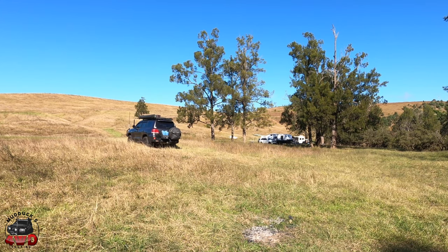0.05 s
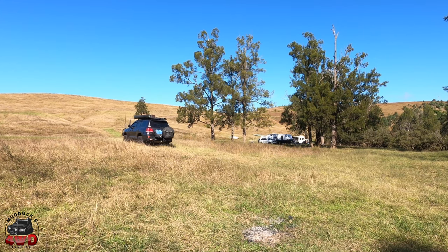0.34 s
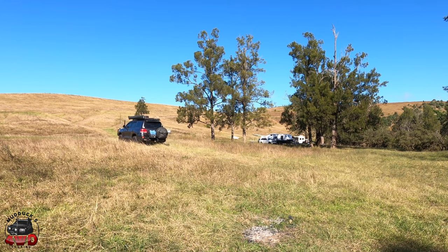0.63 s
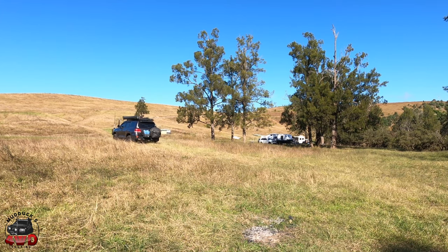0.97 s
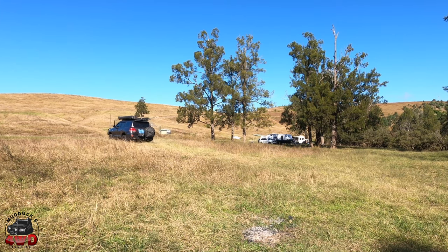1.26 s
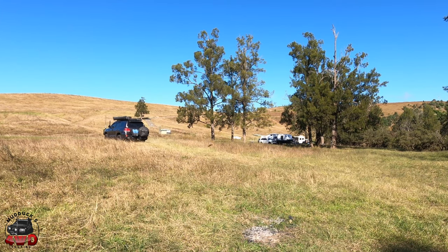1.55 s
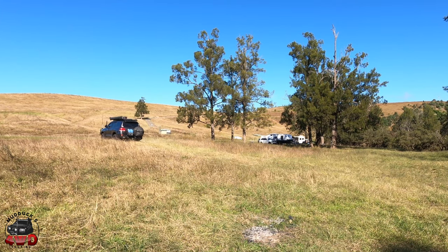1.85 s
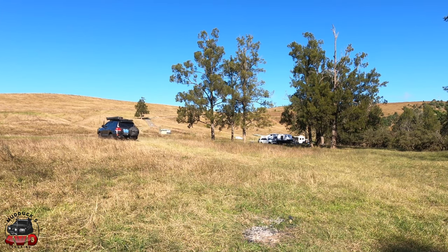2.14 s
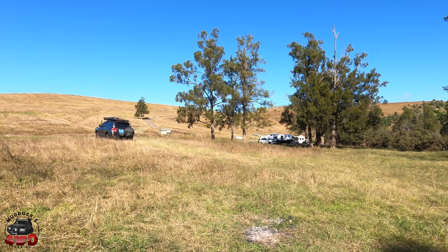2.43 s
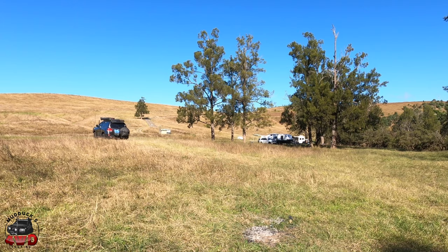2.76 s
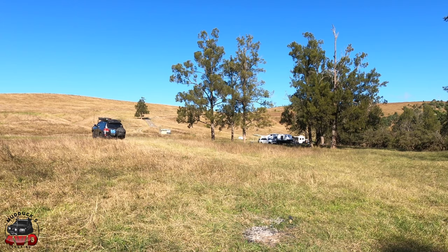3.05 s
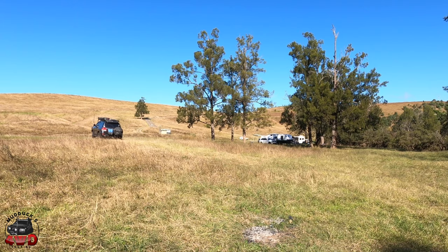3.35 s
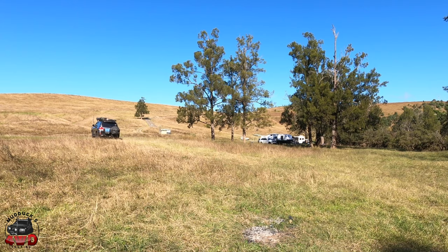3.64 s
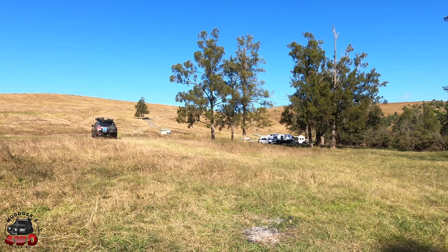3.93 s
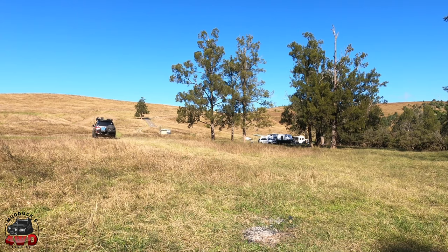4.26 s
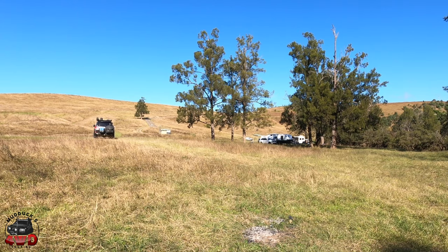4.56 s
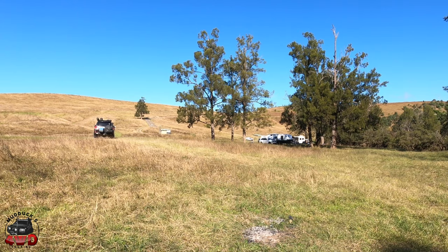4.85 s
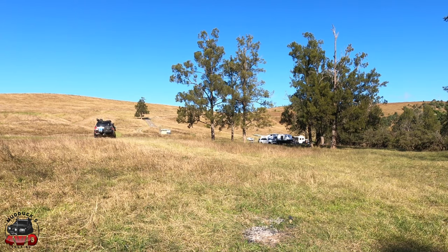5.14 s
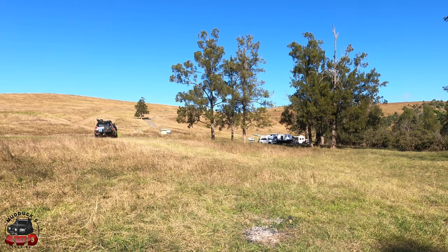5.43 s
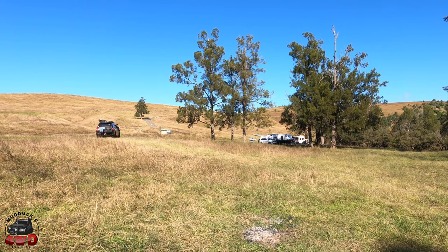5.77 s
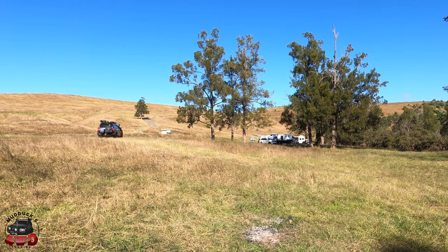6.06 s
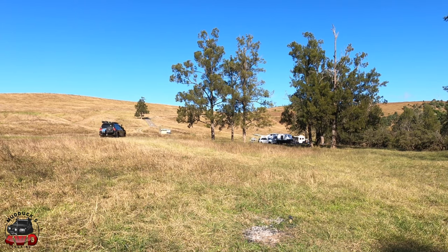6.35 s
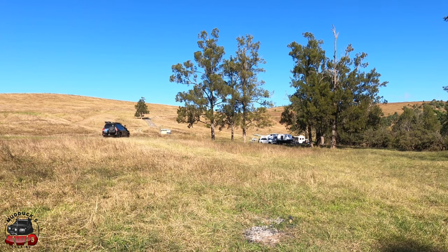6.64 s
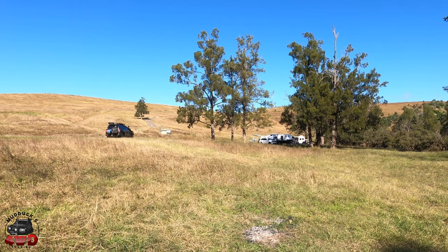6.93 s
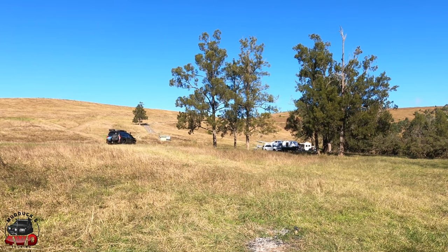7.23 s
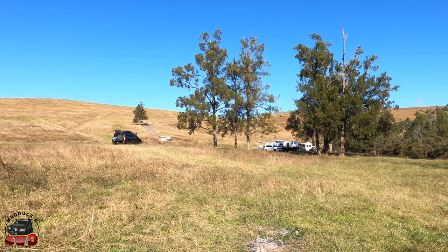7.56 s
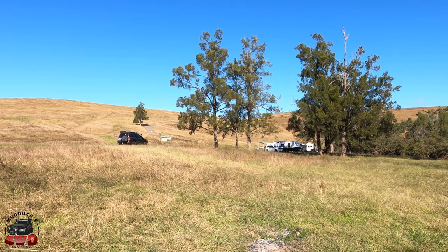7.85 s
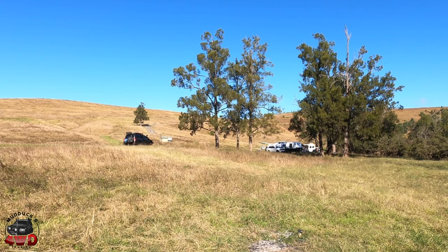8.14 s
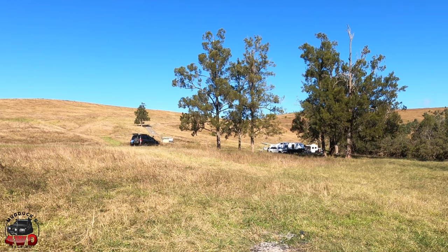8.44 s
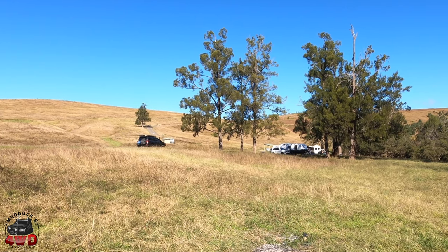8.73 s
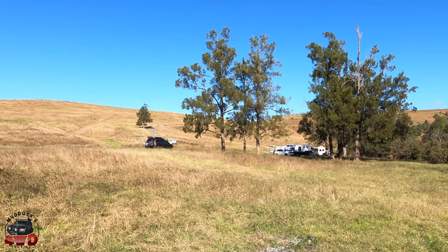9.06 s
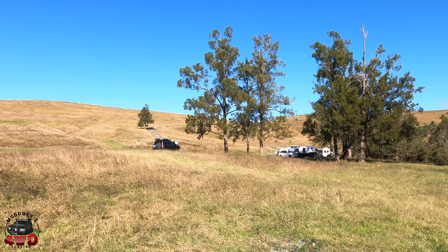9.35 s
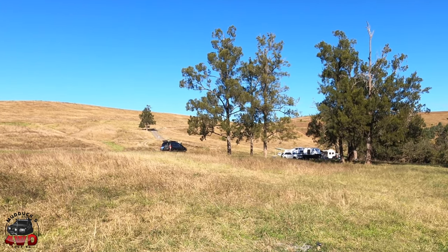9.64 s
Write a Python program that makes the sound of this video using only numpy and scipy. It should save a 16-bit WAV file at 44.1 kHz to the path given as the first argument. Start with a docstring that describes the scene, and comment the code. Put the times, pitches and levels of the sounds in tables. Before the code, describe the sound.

Outdoors in a light breeze, a low, pulsing exhaust and a rattling engine move slowly away from the microphone. Tyres brush through dry grass at first, then thin out to scattered snaps of stalks. Small birds chirp now and then from the trees. The off-road vehicle eases almost to idle, squeals faintly, then pulls again with a steady drone and turns in the distance.

```python
"""A four-wheel drive crawls away over a dry paddock in a light breeze. From the start, exhaust pulses
burble through muffler and tailpipe, the engine clatters, tyres swish, stalks snap and a turbo whistle falls.
Distance weakens the vehicle, the treble first. Near 3 s birds begin to call from the trees, and a thin
squeal soon creeps in and fades. From 5.6 s the tailpipe drones under a long pull; after 7 s the vehicle
turns, its tyres scrubbing the turf, and a hollow roar escapes from the wheel arches."""
import sys
import numpy as np
from scipy import signal
from scipy.fft import rfft, irfft
from scipy.io import wavfile
from scipy.ndimage import uniform_filter1d

SR = 44100
rng = np.random.default_rng(int(sys.argv[2]) if len(sys.argv) > 2 else 0)


def pcm_store(signal):
    """Save signal as 16-bit PCM."""
    levels = np.round(np.clip(np.atleast_2d(signal), -1, 1) * 32767)
    wavfile.write(sys.argv[1], SR, levels.astype(np.int16).T)


N = 427329
TIME = np.arange(N) / SR
START_M, SPEED_M_PER_S, NEAR_M, FAR_M = 13.7, 4.1, 14.7, 26.9
CRUISE_HZ, IDLE_HZ = 72.7, 61.7  # exhaust beats per second

# Engine speed. Each row: time in seconds, exhaust beats per second.
BEAT_RATE = [(0.0, 90.6), (0.12, 87.8), (0.33, 79.7), (0.55, 82.1), (0.7, 80.1), (0.9, 80.3), (1.18, 63.6),
             (1.45, 61.11), (1.64, 65.5), (2.1, 60.0), (2.28, 66.95), (2.72, 67.13), (2.96, 60.64),
             (3.18, 75.65), (3.51, 53.68), (3.78, 66.21), (4.35, 58.58), (4.62, 69.19), (4.83, 62.81),
             (5.24, 70.72), (5.38, 62.34), (5.6, 82.41), (5.88, 72.28), (6.18, 82.1), (6.52, 81.4),
             (6.68, 79.5), (7.06, 84.1), (7.3, 83.1), (7.46, 84.5), (7.7, 79.45), (7.94, 84.14),
             (8.38, 74.81), (8.8, 79.65), (8.92, 74.36), (9.12, 75.96), (9.3, 81.29), (9.5, 72.75),
             (9.69, 74.59)]
# The eight cylinders of one engine cycle. Each row: boom strength, boom delay in beats, rasp strength,
# rasp delay in beats, gas puff strength.
CYLINDERS = [(.96, .01, .36, -.11, .26), (1.33, .06, .88, -.12, .64), (1.0, -.07, .26, -.09, .39),
             (.83, .01, .2, -.11, .23), (.88, .05, .92, .22, .26), (1.52, .03, .92, -.15, .64),
             (.68, -.03, 1.0, .31, .41), (.64, -.02, .55, .05, .28)]
# Pedal lifts and presses. Each row: centre and half-width in seconds, boom and rasp change in dB.
PEDAL_MOVES = [(1.045, 0.07, 1, 1), (3.41, 0.071, 0.5, -9.5), (3.778, 0.13, 0.5, 0.5), (4.15, 0.27, 1, -2),
               (4.652, 0.027, -4, 2), (5.096, 0.31, 1, 1.5), (5.295, 0.042, 1, 0), (5.955, 0.16, -2, 0),
               (7.0, 0.84, 0, -4.5), (7.448, 0.37, 2.5, -0.5), (7.69, 0.045, -5, 2),
               (8.436, 0.069, 4.5, 1.5), (9.07, 0.042, 2.5, 1.5), (9.607, 0.066, 4, 2)]
# Exhaust filter responses. Each row: frequency in Hz, gain in dB.
MUFFLER_RESPONSE = [(15, -35.5), (32, -9.5), (48, 3), (64, 4), (85, -4), (105, 1.5), (130, -6.5),
                    (165, -15.5), (200, -27), (270, -32), (450, -83), (3000, -110)]
TAILPIPE_RESPONSE = [(60, -24.5), (140, 3.5), (195, -7), (230, 4.5), (280, 3), (320, -1), (360, -5),
                     (398, -1.5), (450, -12), (560, -28), (710, -32), (860, -39.5), (1500, -68.5),
                     (6000, -97)]
# Exhaust level laws. Each holds: base level in dB, dB per Hz above cruise, dB per Hz/s of pick-up,
# dB lost per Hz under idle, dB lost side on, dB lost in the turn.
BOOM_LEVEL_LAW = (-25, -0.0363, 0.0291, 0.7, 1.84, 3)
RASP_LEVEL_LAW = (-39.5, 0.32, 0.0386, 0.5, 0.9, 0.7)
# The vehicle's aspect. Each row: time in seconds, flank shown from 0 (tail on) to 1 (side on).
FLANK_SHOWN = [(0, 1), (.6, 0.36), (1.15, 0.64), (1.7, 0.33), (3.5, 0.56), (4.4, 0.15), (5.5, 0.045),
               (7.4, 0.48), (8.3, 0.52), (9.69, 0.89)]
# The turn that swings the tailpipe away: start and end in seconds.
TURN_SPAN_S = (7.2, 8.01)
# Tailpipe resonances. Each row: centre and half-width in seconds, pitch in Hz, level in dB.
PIPE_MODES = [(.5, .5, 322, -45), (.5, .45, 238, -45), (3.15, .15, 398, -53), (5.4, .3, 388, -54),
              (6.2, .3, 402, -57), (7.9, .22, 252, -52), (7.95, .3, 317, -51.5), (7.95, .28, 404, -57)]
# Engine clatter spectra, near and far. Each row: frequency in Hz, gain in dB.
CLATTER_NEAR_SPECTRUM = [(100, -15), (450, 7), (590, -4), (710, -0.5), (870, -14.5), (1190, -2.5),
                         (1400, -1), (1600, -3.5), (2100, -6), (2600, -8.5), (3400, -16), (5000, -33),
                         (9000, -50.5), (13000, -66)]
CLATTER_FAR_SPECTRUM = [(100, -10), (470, 5.5), (580, -11.5), (720, -2), (860, -3), (1100, 4.5),
                        (1300, 3.5), (1650, 4.5), (2100, -3.5), (2900, -6.5), (3400, -15), (5000, -35.5),
                        (9000, -56), (13000, -75)]
# Engine panel resonances. Each row: pitch in Hz, bandwidth in Hz, relative level in dB.
PANEL_MODES = [(705, 130, -6.5), (1215, 65, -10), (1577, 130, -6), (2150, 480, -13), (2780, 105, -9),
               (3760, 130, -12.5), (3980, 120, -13)]
# Tyre swish spectrum, and its further filter at full distance. Each row: frequency in Hz, gain in dB.
SWISH_SPECTRUM = [(500, -1), (2000, 4.5), (3000, 6), (3450, 3.5), (3850, 4), (4250, -1), (4500, -.5),
                  (5500, -4), (7000, -10.5), (8500, -14.5), (10000, -19.5), (11000, -26.5), (14000, -34.5)]
SWISH_FAR_RESPONSE = [(500, 0.5), (3000, 4.5), (3850, 1.5), (5000, 5.5), (7300, 6), (9000, -4),
                      (14000, -18)]
# Loudness of the swish. Each row: time in seconds, level in dB.
SWISH_LEVEL = [(0, -49.5), (.8, -53), (1.6, -59.5), (2.6, -63.5), (3.9, -64.5), (4.6, -69), (4.72, -71.5),
               (5.2, -69.5), (7.0, -74), (7.6, -69), (8.3, -73), (9.69, -75)]
# Tussocks scraping the underside. Each row: centre and half-width in seconds, pitch in Hz, level in dB.
TUSSOCK_SCRAPES = [(0.034, 0.11, 2300, -51), (.105, 0.017, 1830, -51), (0.198, 0.01, 3820, -51),
                   (.60, 0.027, 3870, -58), (0.687, 0.023, 3930, -54.5), (0.8, 0.028, 3850, -53.5),
                   (1.13, 0.013, 2450, -51.5), (1.323, 0.028, 1530, -53.5), (1.843, 0.057, 1380, -58),
                   (1.858, .035, 3870, -60.5)]
# Open-air rumble. Each row: frequency in Hz, gain in dB.
AIR_SPECTRUM = [(15, -13.5), (30, -13.5), (80, -4), (200, -8), (500, -29.5), (1000, -40.5), (3000, -48),
                (7000, -61), (9000, -76.5), (14000, -79)]
# Puffs of breeze. Each row: centre and half-width in seconds, level in dB.
BREEZE_PUFFS = [(2.931, 0.23, -47.5), (6.621, 0.21, -46)]
# Prominent stalk snaps. Each row: start in seconds, peak in dB before dulling, pitch and bandwidth in Hz.
STALK_SNAPS = [(1.915, -61, 8900, 3000), (2.142, -57, 7500, 2500), (2.44, -59, 7140, 1220),
               (3.418, -62, 5050, 1500), (3.535, -64, 7550, 450), (3.699, -56, 4900, 1800),
               (3.8, -72, 7900, 600), (3.889, -62, 7000, 3000), (4.02, -61, 7500, 3500),
               (4.142, -66, 7700, 900), (4.405, -70, 7700, 1200), (5.022, -59, 4700, 1500),
               (5.045, -73, 7900, 405), (5.297, -48, 2550, 650), (5.297, -58, 4100, 1800),
               (5.461, -61, 5600, 3000), (6.225, -69, 6100, 400), (6.384, -65, 4880, 900),
               (6.475, -62, 6000, 3500), (7.365, -58, 4000, 1200)]
# Bird notes. Each row: start and length in seconds, pitch and glide in Hz, level in dB, hoarseness 0-1.
BIRD_NOTES = [(2.818, 0.11, 4170, -100, -68.5, .4), (2.89, .24, 4330, -100, -68.5, 0.68),
              (2.979, .11, 1320, -190, -60, 0.55), (3.402, 0.15, 964, 56, -68, 0.6),
              (3.52, .045, 1980, -250, -55, .6), (3.665, .3, 1060, -15, -56, .38),
              (3.924, 0.075, 4240, -100, -62.5, 0.35), (3.96, .07, 2060, -100, -63, 0.2),
              (4.13, 0.055, 2080, 301, -63.5, .45), (4.495, 0.05, 2015, -50, -59.5, 0.28),
              (4.645, 0.04, 2000, 46, -64, .6), (5.325, .08, 3880, -70, -70.5, .25),
              (5.373, 0.075, 1850, -190, -63.5, 0.2), (5.475, .11, 1940, 100, -60.5, 0.15),
              (5.545, .103, 1930, -175, -56, .2), (6.043, .1, 2920, 34, -70, 0.3),
              (6.058, .08, 3370, 9, -73, .2), (7.98, .14, 1310, 0, -62.5, .2),
              (9.185, .085, 1700, 0, -61, .2), (9.26, .14, 1285, -40, -60, .25),
              (9.215, .05, 4900, 200, -74, .6), (9.604, .04, 3050, 78, -68, .3),
              (9.605, .05, 1500, 0, -63, .3)]
# Bands of the squeal. Each row: pitch in Hz, bandwidth in Hz, level in dB.
SQUEAL_BANDS = [(3850, 900, -72), (4760, 420, -75), (5780, 400, -88)]
# Overtones of the long pull. Each row: multiple of the beat rate, level in dB.
DRONE_PARTIALS = [(2.75, -56), (3, -54), (3.125, -58), (3.25, -55), (3.875, -59), (4.875, -62), (5, -58.5)]
# Tyres groaning through the turn. Each row: centre in seconds, pitch and bandwidth in Hz, level in dB,
# half-width in seconds.
TURF_SCRUBS = [(7.6, 336, 130, -59, 1), (7.55, 450, 92, -58, .9), (7.7, 670, 200, -67.5, 0.98),
               (7.53, 2700, 550, -66.5, 0.27)]
# Likeness of the two microphone ports, near and far. Each row: frequency in Hz, coherence 0-1.
COHERENCE_NEAR = [(100, 0.9), (300, 0.9), (700, 0.99), (1400, 1), (2900, 0.97), (6000, 1), (13000, 0.5)]
COHERENCE_FAR = [(100, 1), (300, 0.88), (700, 0.62), (1400, 0.86), (2900, 0.42), (6000, 0.47), (13000, .3)]
# Level of the left port over the right. Each row: frequency in Hz, ratio in dB.
PORT_BALANCE = [(60, 1.3), (200, 1.4), (360, 0), (670, .4), (1210, 1.8), (2220, 2.5), (4050, .4),
                (13500, -.6)]
# Phase of the left port against the right. Each row: frequency in Hz, lead in radians.
PORT_LEAD = [(0, 0), (860, -.36), (3010, -.7), (3790, -1.0), (4740, -.35), (6460, -1.1), (8440, .3),
             (10300, -1.2), (13600, 0)]


def amp(db):
    """Amplitude grows tenfold with every 20 dB."""
    return 10 ** (np.asarray(db) / 20)


def unit(x):
    """Normalisation brings the rms to 1."""
    return x / np.sqrt(np.mean(np.abs(x) ** 2) + 1e-20)


def steady(x):
    """Division by the running rms levels the envelope."""
    power = uniform_filter1d(uniform_filter1d(x ** 2, size=8000), size=6000)
    return x / np.sqrt(np.abs(power) + 1e-20)


def curve(points):
    """Linear interpolation joins points into a curve over time."""
    return np.interp(TIME, *np.transpose(points))


def swell(centre_s, half_width_s):
    """A Gaussian envelope falls to 1/e one half-width from its centre."""
    return np.exp(-((TIME - centre_s) / half_width_s) ** 2)


def spectrum_at(points, hz):
    """A spectrum is interpolated on a log-frequency axis."""
    f, value = np.transpose(points)
    return np.interp(np.log(hz + 1), np.log(f + 1), value)


def drift(hz):
    """Noise low-passed at hz gives a random fluctuation of rms 1."""
    rolloff = 1 + (np.fft.rfftfreq(N, 1 / SR) / hz) ** 4
    return unit(irfft(rfft(rng.standard_normal(N)) / rolloff, N))


def colour(x, points, size=8192):
    """A minimum-phase filter imposes a spectrum and rings after each pulse."""
    log_gain = np.log(amp(spectrum_at(points, np.abs(np.fft.fftfreq(size, 1 / SR)))))
    ring = np.fft.ifft(np.exp(np.conj(signal.hilbert(log_gain)))).real[:size // 2]
    return signal.oaconvolve(x, ring)[:N]


def resonate(x, hz, width_hz):
    """A resonator passes a band around hz, which may move."""
    carrier = np.exp(2j * np.pi * np.cumsum(hz * np.ones(len(x))) / SR)
    r = np.exp(-np.pi * width_hz / SR)
    return (carrier * signal.lfilter([(1 - r) ** 2], [1, -2 * r, r * r], x / carrier)).real


def noise_band(hz, width_hz, samples=N):
    """A resonator driven by white noise gives a band of noise, here of rms 1."""
    return unit(resonate(rng.standard_normal(samples), hz, width_hz))


def add(mix, start_s, sound):
    """Superposition: a sound adds to the mix from its start time."""
    part = mix[max(round(start_s * SR), 0):][:len(sound)]
    part += sound[:len(part)]


def distance():
    """Uniform motion carries the vehicle away; the range is in metres."""
    return START_M + SPEED_M_PER_S * TIME


def spreading_db():
    """Spherical spreading costs 6 dB per doubling of distance."""
    return -20 * np.log10(distance() / START_M)


def farness():
    """Range sets a blend from 0 (near) to 1 (far)."""
    return np.clip((distance() - NEAR_M) / (FAR_M - NEAR_M), 0, 1)


def scatter(source, coherence):
    """Scattered sound is only partly coherent at the two ports."""
    a, b = rfft(source()), rfft(source())
    same = np.clip(spectrum_at(coherence, np.fft.rfftfreq(N, 1 / SR)), 0, 1)
    common, apart = a * np.sqrt((1 + same) / 2), b * np.sqrt((1 - same) / 2)
    return irfft(np.array([common + apart, common - apart]), N)


def recede(near, far):
    """With distance, direct sound yields its share of the power to duller, scattered sound."""
    direct = np.sqrt(1 - farness()) * unit(scatter(near, COHERENCE_NEAR))
    return direct + np.sqrt(farness()) * unit(scatter(far, COHERENCE_FAR))


def pulse_train(beats, strength, delay, scatter_db, jitter):
    """Unequal cylinders give one pulse a beat, in a pattern whose period is the engine cycle."""
    k = np.arange(int(beats[-1]))
    cylinder, chance = k % len(strength), rng.standard_normal((len(k), 2))
    at = np.searchsorted(beats, k + .5 + delay[cylinder] + jitter * chance[:, 1])
    pulses = np.zeros(N)
    pulses[np.minimum(at, N - 1)] = strength[cylinder] * amp(scatter_db * chance[:, 0])
    return pulses


def baffles(x, delay_s=.009, at_hz=397.5):
    """Dispersion: the baffles delay higher partials longer, stretching each beat."""
    group_delay = delay_s * np.minimum(np.fft.rfftfreq(N, 1 / SR) / at_hz, 2) ** 2
    return irfft(rfft(x) * np.exp(-2j * np.pi * np.cumsum(group_delay) * SR / N), N)


def exhaust_db(law):
    """Exhaust level follows engine speed and pick-up; directivity makes it loudest from behind."""
    db, per_hz, per_pickup, per_hz_idle, side_db, turn_db = law
    hz = curve(BEAT_RATE)
    pickup = uniform_filter1d(np.gradient(hz) * SR, size=4410)
    effort_db = per_hz * (hz - CRUISE_HZ) + per_pickup * pickup - per_hz_idle * np.maximum(IDLE_HZ - hz, 0)
    away_db = side_db * curve(FLANK_SHOWN) + turn_db * np.interp(TIME, TURN_SPAN_S, [0, 1])
    return db + effort_db + spreading_db() - away_db


def exhaust(beats, puff_s=.0024, steady_flow=.73):
    """Source and filter: pulses boom in the muffler and, with puffs of gas, rasp in the tailpipe."""
    boom_size, boom_delay, rasp_size, rasp_delay, puff_size = np.transpose(CYLINDERS)
    boom = colour(pulse_train(beats, boom_size, boom_delay, scatter_db=.45, jitter=.006), MUFFLER_RESPONSE)
    # the second harmonic grows as the vehicle turns away
    second = signal.sosfiltfilt(signal.butter(2, [130, 190], "band", fs=SR, output="sos"), boom)
    boom = steady(boom + .82 * second * np.interp(TIME, (6.8, 8), [0, 1]))
    sharp = pulse_train(beats, rasp_size, rasp_delay, scatter_db=1.3, jitter=.007)
    puffs = pulse_train(beats, puff_size, boom_delay, scatter_db=.5, jitter=.0029)
    gas = unit(signal.lfilter([1], [1, -np.exp(-1 / (puff_s * SR))], puffs)) + steady_flow
    hiss = signal.sosfilt(signal.butter(4, 170, "high", fs=SR, output="sos"), gas * rng.standard_normal(N))
    roughness = np.interp(curve(BEAT_RATE), [62, 80], [.6, .35])  # ragged near idle, firm under load
    rasp = steady(colour(unit(baffles(sharp)) + roughness * unit(hiss), TAILPIPE_RESPONSE))
    boom_db, rasp_db = sum(np.outer(change_db, swell(s, half)) for s, half, *change_db in PEDAL_MOVES)
    boom *= amp(exhaust_db(BOOM_LEVEL_LAW) + boom_db)
    rasp *= amp(exhaust_db(RASP_LEVEL_LAW) + rasp_db)
    return boom + rasp


def pipe_rings(width_hz=17):
    """Gas flow excites the tailpipe's resonances, whose pitches do not follow engine speed."""
    return sum(steady(noise_band(hz, width_hz)) * amp(db) * swell(s, half)
               for s, half, hz, db in PIPE_MODES)


def clatter(beats, db=-53, db_per_hz=.155, flank_db=6.5):
    """Forced vibration: combustion knocks rattle the block and its panels over the rush of the fan."""
    knocking = 1 + .44 * np.exp(-(2 * beats % 1) / .5)
    # as the body flexes, each panel flares on its own and the pitches wander
    flares_db = [1.5 * drift(7) for _ in PANEL_MODES]
    flex = 1 + .007 * drift(4)

    def rattle(spectrum, panels_db):
        knocks = knocking * rng.standard_normal(N)
        panels = sum(amp(mode_db + flare_db) * unit(resonate(knocks, hz * flex, width))
                     for (hz, width, mode_db), flare_db in zip(PANEL_MODES, flares_db))
        block = unit(colour(knocking * rng.standard_normal(N), spectrum))
        return block + amp(panels_db) * panels
    flicker_db = .8 * drift(18)
    speed_db = db_per_hz * (curve(BEAT_RATE) - CRUISE_HZ)
    exposure_db = flank_db * curve(FLANK_SHOWN)  # tail on, the body hides the engine
    sound = recede(lambda: rattle(CLATTER_NEAR_SPECTRUM, 0), lambda: rattle(CLATTER_FAR_SPECTRUM, -16.5))
    return sound * amp(db + speed_db + exposure_db + spreading_db() + flicker_db)


def chassis(near_db=-45, far_loss_db=16):
    """Bumps excite a low resonance of the body, heard mostly while it is near."""
    return noise_band(hz=54, width_hz=20) * amp(near_db - far_loss_db * farness())


def grass_swish(cracks_per_s=700, grain_db=6.5, crackle=.35):
    """Friction and fracture: tyres brush and crush dry stalks, a swish full of tiny cracks."""
    def near():
        onsets = rng.random(N) < cracks_per_s / SR
        sizes = amp(grain_db * np.minimum(rng.exponential(1, N), 4))
        cracks = onsets * sizes * rng.choice([-1, 1], N)
        return colour(rng.standard_normal(N) + crackle * unit(cracks), SWISH_SPECTRUM)
    swish = recede(near, lambda: colour(near(), SWISH_FAR_RESPONSE))
    return swish * amp(curve(SWISH_LEVEL) + 1.52 * drift(24))


def tussocks(width_hz=410):
    """Friction of tussocks on the underside gives brief, narrow bands of noise."""
    return sum(noise_band(hz, width_hz) * amp(db) * swell(s, half) for s, half, hz, db in TUSSOCK_SCRAPES)


def turbo(start_hz=10400, end_hz=8250, fall_s=.45, db=-83, end_s=1.22, release_s=.11):
    """A breathy whistle relaxes exponentially in pitch as the boost drops."""
    hz = end_hz + (start_hz - end_hz) * np.exp(-TIME / fall_s)
    envelope = np.clip((end_s - TIME) / release_s, 0, 1)
    return noise_band(hz, width_hz=420) * amp(db + 4 * drift(16)) * envelope


def breeze(air_db=-46):
    """Moving air rumbles evenly, and its puffs buffet each microphone port independently."""
    gain = amp(air_db + .8 * drift(3))
    air = scatter(lambda: unit(colour(rng.standard_normal(N), AIR_SPECTRUM)), COHERENCE_FAR) * gain
    puffs = sum(amp(db) * swell(s, half) for s, half, db in BREEZE_PUFFS)
    return air + puffs * np.array([noise_band(hz=27, width_hz=130) for port in range(2)])


def stalk_snaps(faint_per_s=22, faint_hz=(3200, 7900), faint_width_hz=1800):
    """Brittle fracture: each stalk gives a damped burst at its own pitch; air absorption dulls the top."""
    out, t = np.zeros(N), np.arange(SR // 20) / SR
    faint_db = -61.5 + spreading_db() - 1.5 * farness()
    faint = []
    for when, size, height in rng.random((int(faint_per_s * N / SR), 3)):
        db = faint_db[int(when * N)] + 10 * (size - .5) - 8 * height  # higher snaps are weaker
        faint.append((when * N / SR, db, np.interp(height, [0, 1], faint_hz), faint_width_hz))
    for s, db, hz, width in STALK_SNAPS + faint:
        decay_s = .002 + hz / 1.3e6
        crack = resonate(rng.standard_normal(len(t)) * np.exp(-t / decay_s), hz, width)
        add(out, s, amp(db) * crack / np.abs(crack).max())
    return signal.sosfilt(signal.butter(6, 8800, fs=SR, output="sos"), out)


def birds(arch=.02, octave_db=-22, attack_share=.3, release_share=.22):
    """Frequency-modulated whistles arch and glide, hoarse with noise; air absorbs the top overtones."""
    tremble, flutter = 1 + .007 * drift(70), amp(.8 * drift(35))
    out = np.zeros(N)
    for s, length, pitch, glide, db, hoarse in BIRD_NOTES:
        u = np.linspace(0, 1, int(length * SR))
        contour = pitch * (1 - arch * (2 * u - 1) ** 2) + glide * (u - .5)
        hz = contour * np.interp(s + u * length, TIME, tremble)
        phase = 2 * np.pi * np.cumsum(hz) / SR
        whistle = unit(np.sin(phase) + amp(octave_db) * np.sin(2 * phase))
        note = (1 - hoarse) * whistle + hoarse * noise_band(hz, .12 * pitch, len(u))
        envelope = np.clip(np.minimum(u / attack_share, (1 - u) / release_share), 0, 1)
        add(out, s, amp(db) * unit(note) * envelope / envelope.max())
    return signal.sosfilt(signal.butter(6, 5400, fs=SR, output="sos"), out * flutter)


def trees(x, t60_s=.22, wet_db=-14):
    """Scattering from the tree line adds a faint reverberant tail."""
    t = np.arange(SR) / SR
    tail = rng.standard_normal((2, SR)) * amp(-60 * t / t60_s) * (t > .01)
    return x + amp(wet_db) * signal.fftconvolve(x[None], tail / np.linalg.norm(tail[0]), axes=1)[:, :N]


def squeal(start_s=3.55, end_s=4.72, rise_s=.5, fade_s=.12):
    """Narrow resonances flutter in a faint squeal, perhaps from the friction of a dragging brake."""
    envelope = np.clip(np.minimum((TIME - start_s) / rise_s, (end_s - TIME) / fade_s), 0, 1)
    return envelope * sum(noise_band(hz, width) * amp(db + 2 * drift(25)) for hz, width, db in SQUEAL_BANDS)


def pipe_drone(beats, span_s=(5.6, 6.3, 7.5, 7.9)):
    """Under load the tailpipe radiates harmonics of the engine cycle, rough in phase and level."""
    partials = sum(unit(np.sin(2 * np.pi * multiple * beats + .45 * drift(8))) * amp(db + 1.8 * drift(14))
                   for multiple, db in DRONE_PARTIALS)
    return partials * np.interp(TIME, span_s, [0, 1, 1, 0])


def turf_scrub():
    """Sliding friction makes the tyres groan, most strongly in the middle of the turn."""
    return sum(noise_band(hz, width) * amp(db) * swell(s, half) for s, hz, width, db, half in TURF_SCRUBS)


def engine_bay(db=-65, opens_s=(7.2, 8.4)):
    """Directivity: a hollow roar from the wheel arches is heard as the vehicle swings side on."""
    return noise_band(hz=1020, width_hz=800) * amp(db) * np.interp(TIME, opens_s, [0, 1])


def scene():
    """The sources superpose and reach the two ports with slightly unequal level and phase."""
    beats = np.cumsum(curve(BEAT_RATE)) / SR  # running count of exhaust beats
    vehicle = exhaust(beats) * amp(.59 * drift(4))  # the load wavers over rough ground
    vehicle = vehicle + pipe_drone(beats) + pipe_rings() + clatter(beats) + engine_bay() + chassis()
    vehicle = vehicle + grass_swish() + tussocks() + turf_scrub() + turbo() + squeal()
    mix = vehicle + stalk_snaps() + trees(birds()) + breeze()
    hz, side = np.fft.rfftfreq(N, 1 / SR), np.array([[.5], [-.5]])
    lead = np.interp(hz, *np.transpose(PORT_LEAD))
    return irfft(rfft(mix) * amp(side * spectrum_at(PORT_BALANCE, hz)) * np.exp(1j * side * lead), N)


def record(dry):
    """A linear-phase low-pass filter limits the band to 13.3 kHz."""
    return signal.oaconvolve(dry, signal.firwin(511, 13300, window=("kaiser", 9), fs=SR)[None], "same")


dry = scene()
out = record(dry)
pcm_store(out)
```